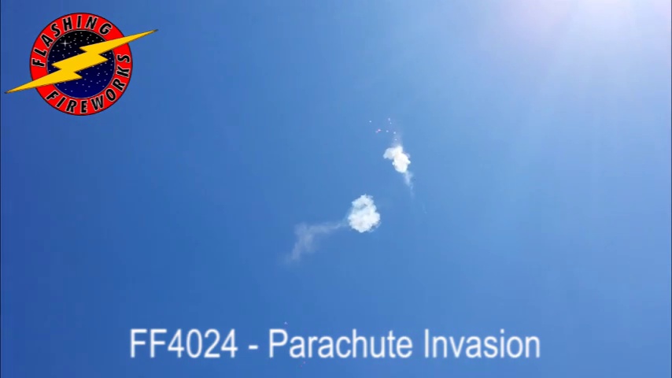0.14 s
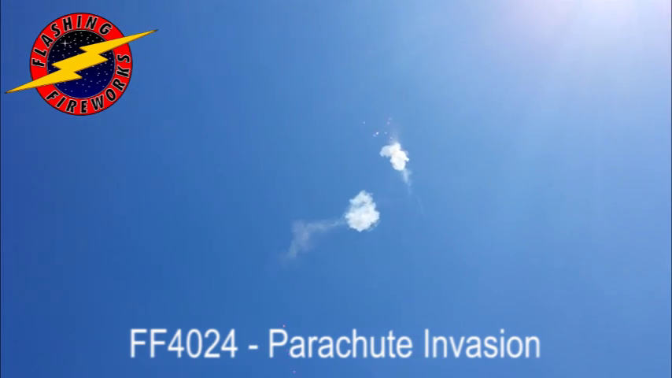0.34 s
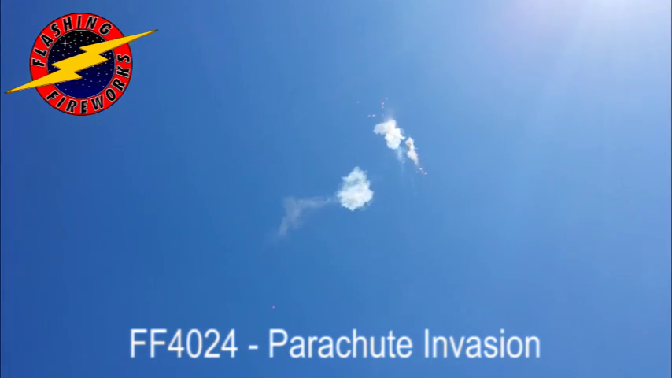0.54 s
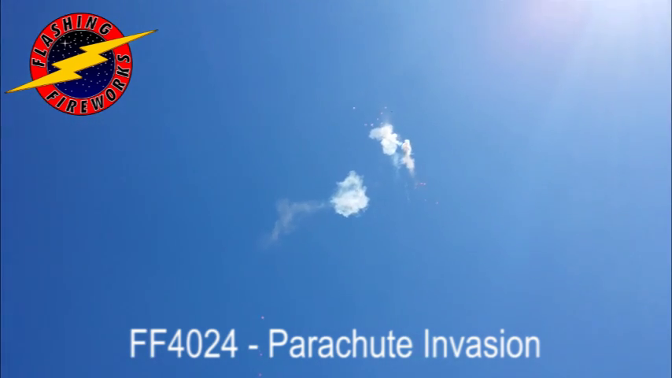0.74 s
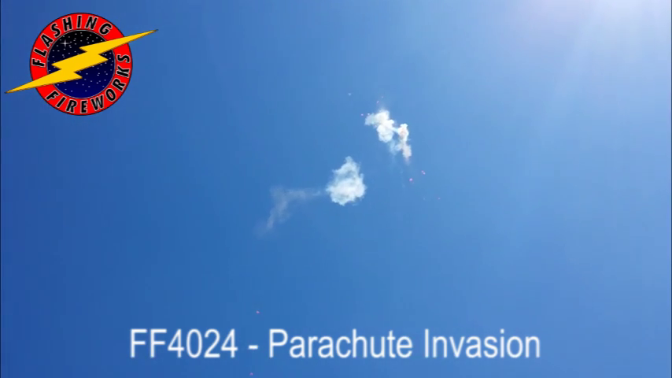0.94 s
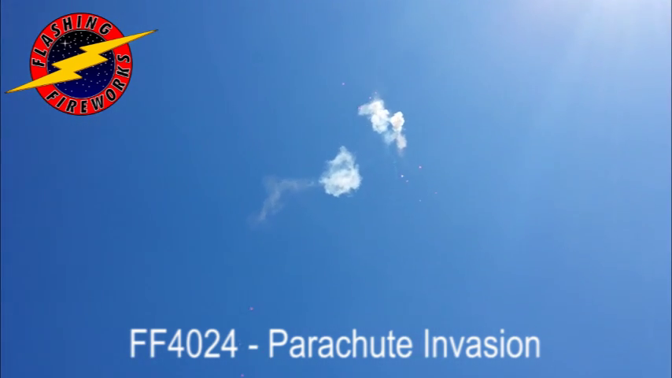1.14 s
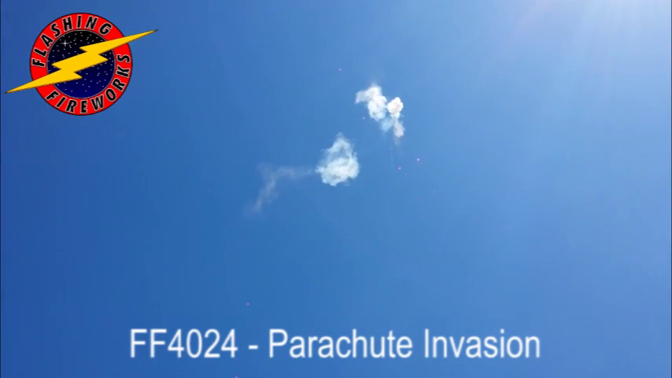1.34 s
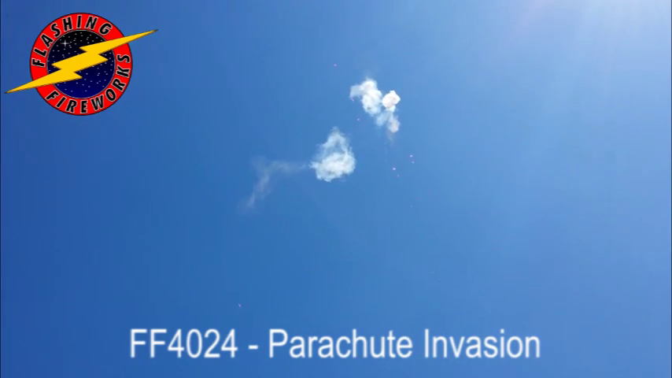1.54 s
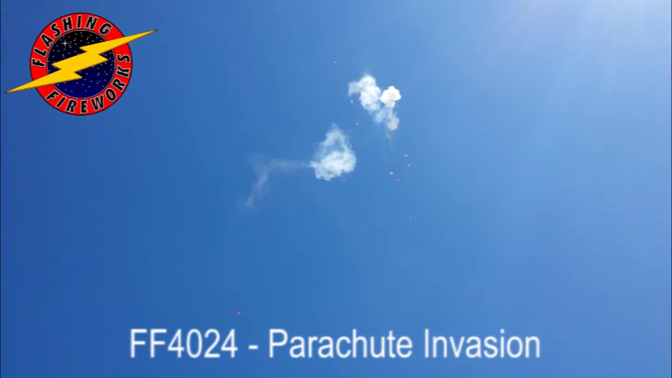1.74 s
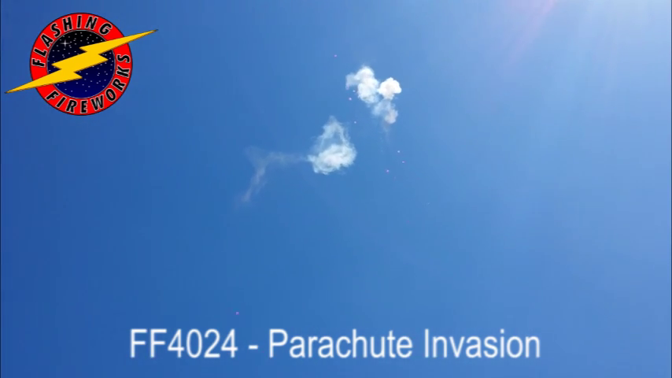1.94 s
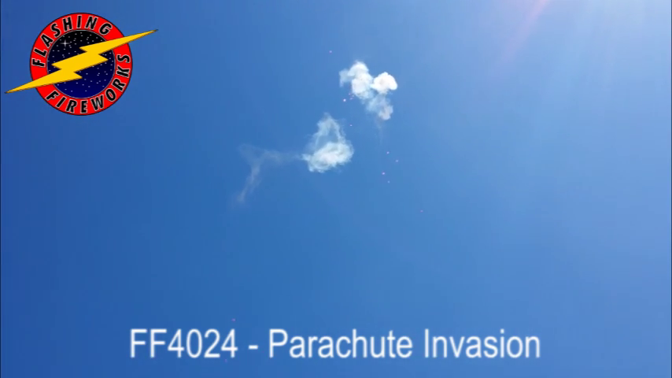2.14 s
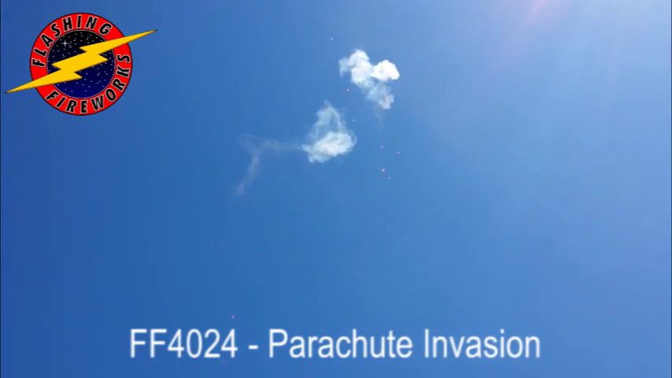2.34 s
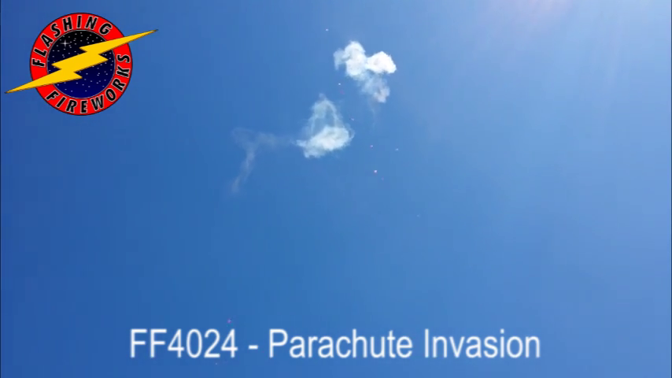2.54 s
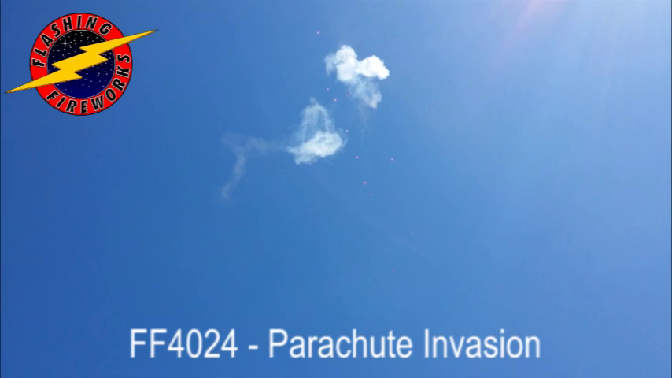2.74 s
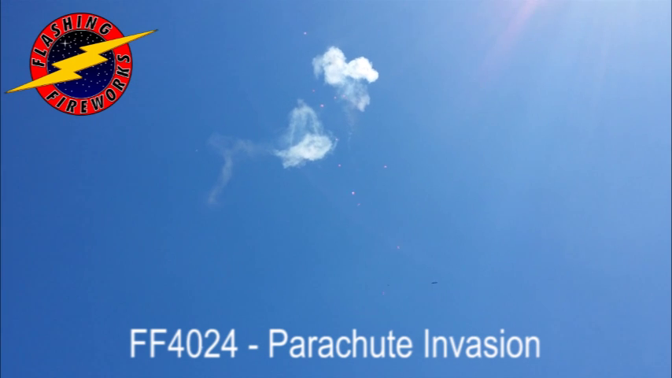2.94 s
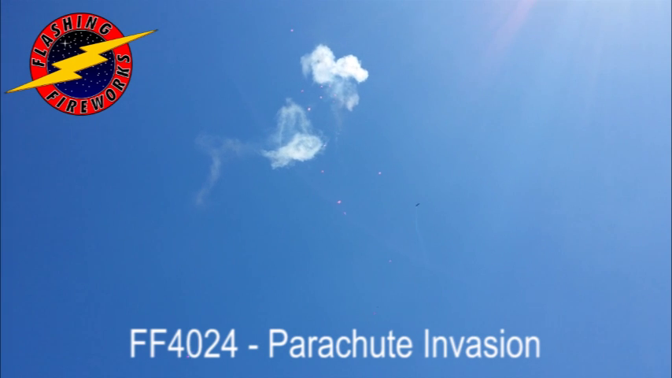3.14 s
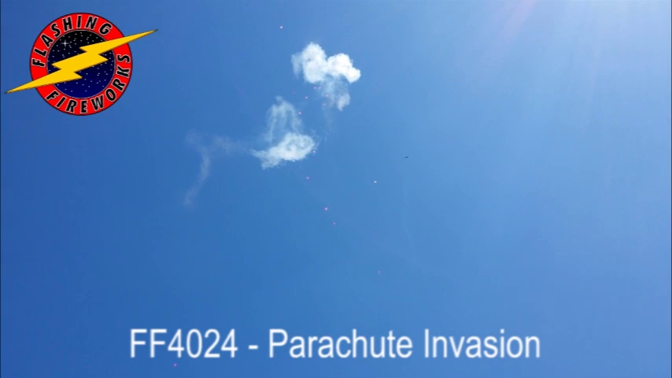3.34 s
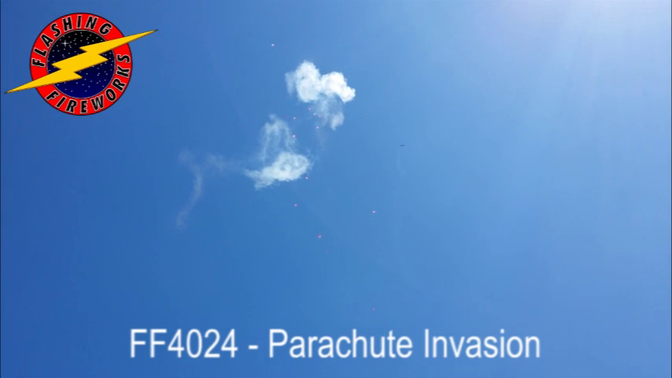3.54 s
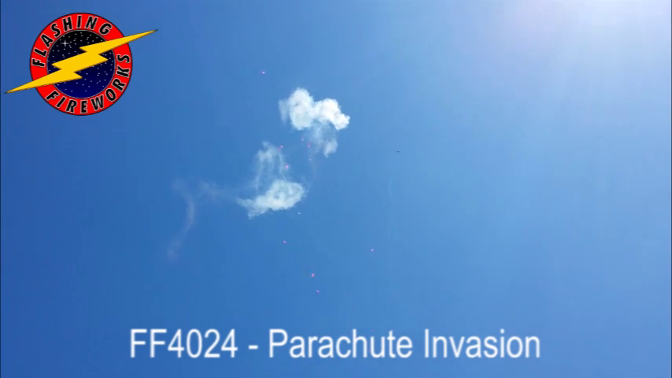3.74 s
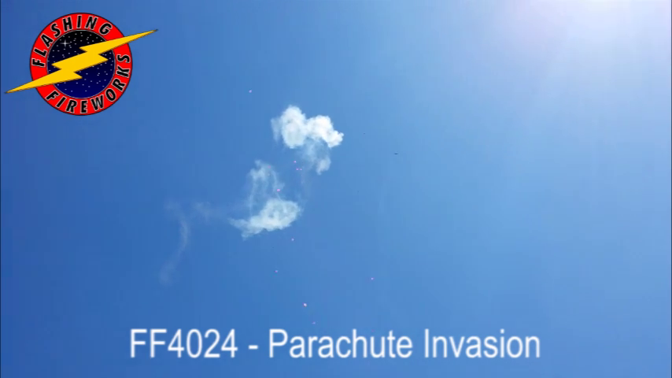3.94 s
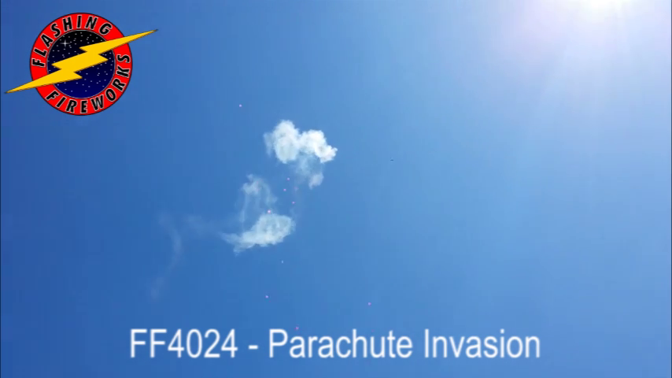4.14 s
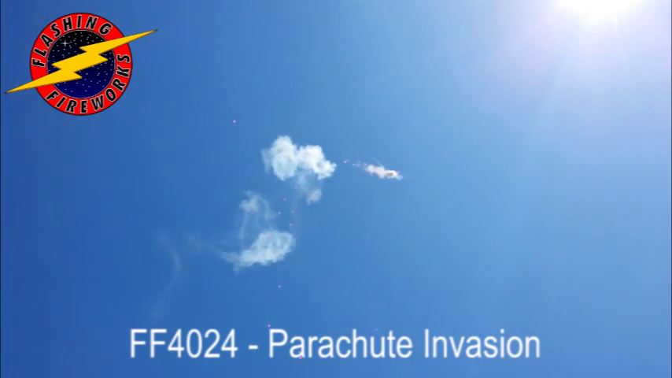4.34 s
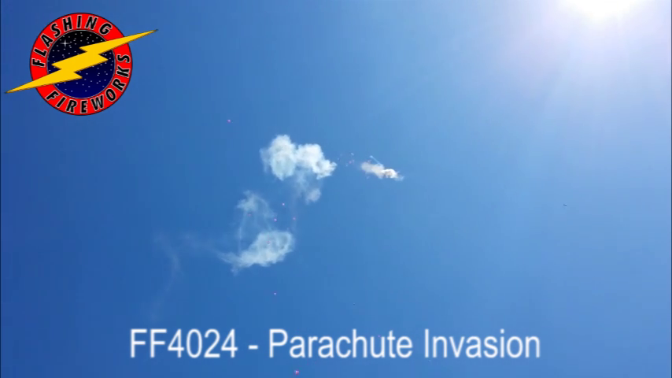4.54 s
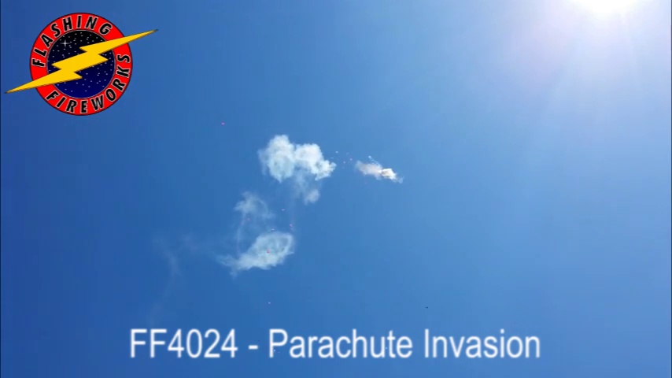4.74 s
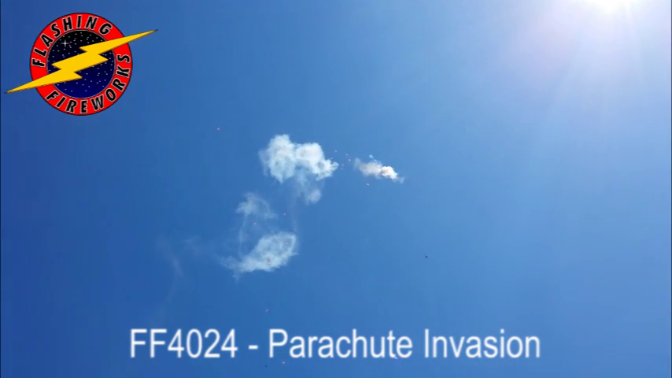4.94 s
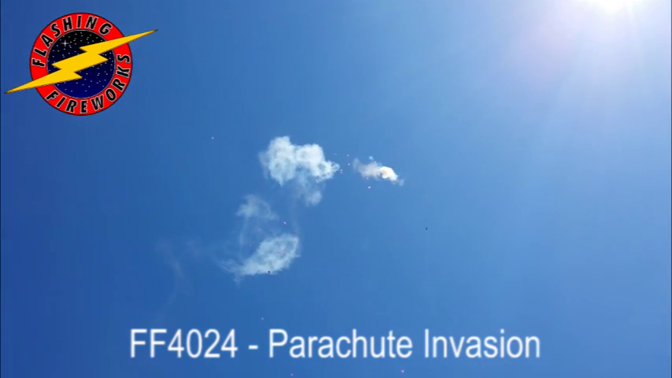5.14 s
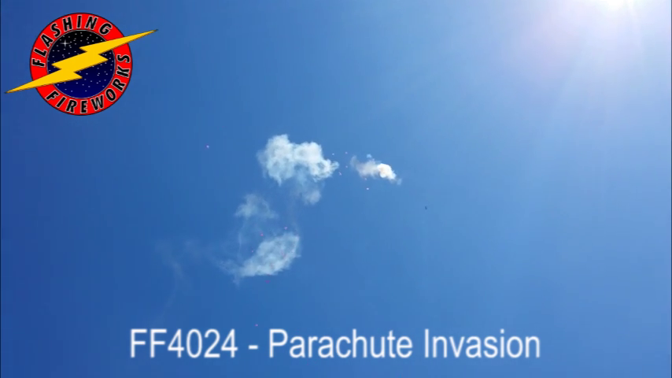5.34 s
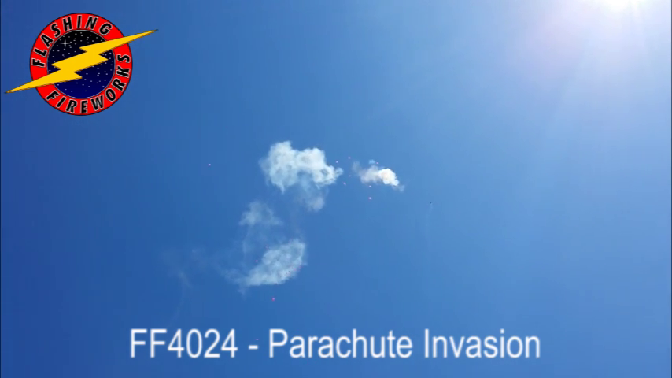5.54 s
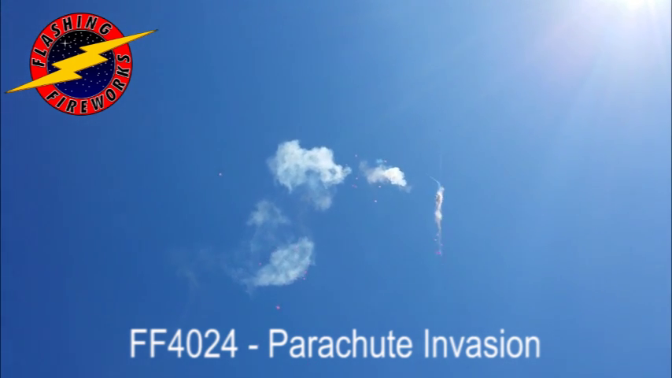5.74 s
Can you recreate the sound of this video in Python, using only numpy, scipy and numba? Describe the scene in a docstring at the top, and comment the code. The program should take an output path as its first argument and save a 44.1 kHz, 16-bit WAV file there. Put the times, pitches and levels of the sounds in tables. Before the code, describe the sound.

Five sharp firework cracks and booming launch shots echo across an open field, with faint birds and far traffic between them.

```python
"""Firework cake in an open field.

Lift charges boom from the tubes and shells crack high above, each crack arriving twice: direct
and off the ground. Grass and trees scatter every shot; hedges and far walls throw it back.
The shots overload a camera's two-port microphone: its gain ducks for about a second, then far
traffic, birds and faint hollow blips swell back."""
import sys
import numpy as np
from scipy import signal
from scipy.io import wavfile
from scipy.ndimage import uniform_filter1d
from numba import njit

SR = 44100
rng = np.random.default_rng(int(sys.argv[2]) if len(sys.argv) > 2 else 0)


def store_wav(level_fs):
    """Save 16-bit WAV to argv[1]."""
    pcm = np.round(np.clip(np.atleast_2d(level_fs), -1, 1) * 32767)
    wavfile.write(sys.argv[1], SR, pcm.T.astype(np.int16))


N = 254898


def undb(db):
    """Decibels to gain."""
    return 10 ** (np.asarray(db) / 20)


def panned(db, lean_db):
    """Stereo gains: the left raised by lean_db, the right lowered by as much."""
    return undb(db + lean_db * np.array([[1], [-1]]))


def add(out, x, s):
    """Mix x into out from s seconds on."""
    i = int(round(s * SR))
    n = max(min(x.shape[-1], N - i), 0)
    out[:, i:i + n] += x[..., :n]


def band(n, hz, octaves, alike_below_hz=550):
    """Diffuse noise band of rms near 1; both ports hear nearly the same bass."""
    edges = np.clip(hz * 2 ** (np.array([-octaves, octaves]) / 2), 20, SR / 2.1)
    bandpass = signal.butter(2, edges, "band", fs=SR, output="sos")
    x = signal.sosfilt(bandpass, rng.standard_normal((2, n + 2000)))[:, 2000:]
    x = x / x.std()
    alike = 1 / (1 + (hz / alike_below_hz) ** 2)
    mid, side = np.sqrt((1 + alike) / 2) * x[0], np.sqrt((1 - alike) / 2) * x[1]
    return np.array([mid + side, mid - side])


def wander(rate_hz, n=N):
    """Smooth random drift with a spread near 1."""
    hold = int(SR / rate_hz)
    steps = np.repeat(rng.standard_normal(n // hold + 1), hold)
    return 1.3 * uniform_filter1d(uniform_filter1d(steps, hold), hold)[:n]


def traffic_and_air():
    """The bed: rumble and roar of far traffic under a hiss of air, flickering in half-octave bands."""
    # Each row: frequency in Hz, relative noise density in dB.
    spectrum = [(24, -41), (40, -14), (108, -3.5), (427, -13), (621, -8), (1410, -20), (1730, -21),
                (3220, -24.5), (4460, -25), (5050, -26.5), (15500, -44.5)]
    # Each row: time in seconds, swell of the traffic in dB.
    traffic_swell = [(0, 1), (.4, 0.5), (.9, 1), (1.3, 1), (1.6, 4), (1.9, 0), (2.35, 0.5), (2.7, -0.5),
                     (3.0, 0), (3.3, 1), (3.6, 1.5), (4.0, -0.5), (4.6, 3), (5.2, 3), (5.65, 3.5)]
    t = np.arange(N) / SR
    rumble_db = -2 + .89 * t
    roar_db = np.interp(t, *np.transpose(traffic_swell))
    air_db = -3.5 + .4 * roar_db
    top_db = 10 * (t > 5.375) * np.exp(-np.abs(t - 5.375) / .11)  # the treble jumps once and sinks back
    roar_flicker_db = .7 * wander(16)
    layers_db = [rumble_db, roar_db + roar_flicker_db, air_db, top_db]
    spectrum_hz, density_db = np.transpose(spectrum)
    out = 0
    for hz in 45 * 2 ** np.arange(0, 8.6, .5):
        layer = np.searchsorted([300, 1700, 6500], hz)
        band_db = np.interp(np.log(hz), np.log(spectrum_hz), density_db) + 10 * np.log10(hz / 100)
        flicker_db = (2.5 if hz < 1500 else 1.2) * wander(20)
        out += panned(band_db + layers_db[layer] + flicker_db, 1.2 * (hz > 6500)) * band(N, hz, .5)
    return undb(-44.5 - 5.5) * np.array([np.roll(out[0], 10), out[1]])  # reaches the right port first


def frayed_notes(notes, rough, flutter_hz):
    """Short notes, steady or gliding, each from its own side and frayed by the air on the way."""
    out = np.zeros((2, N))
    for (s, length, start_hz, end_hz, db), lean_db in zip(notes, rng.uniform(-.5, 1.65, len(notes))):
        n = int(length * SR)
        flutter = uniform_filter1d(rng.standard_normal((2, 2, n)), int(SR / flutter_hz))
        fray = 1 + rough * (flutter[0] + 1j * flutter[1]) / flutter.std()
        glide = np.exp(2j * np.pi * np.cumsum(np.linspace(start_hz, end_hz, n)) / SR)
        envelope = signal.windows.tukey(n, .4) * np.exp(-.8 * np.arange(n) / n)
        add(out, panned(db, lean_db) * (fray * glide).imag * envelope, s)
    return out


def hollow_blips():
    """Faint 30 ms blips, often about an eighth of a second apart."""
    # Each row: start in seconds, pitch in Hz, level in dB.
    blips = [(.145, 643, -41), (.248, 696, -41), (1.435, 909, -37), (1.492, 625, -38.5), (1.64, 600, -41),
             (1.76, 536, -41), (1.88, 680, -41), (1.988, 723, -40.5), (2.038, 610, -44.5), (2.1, 647, -43),
             (2.295, 600, -38.5), (3.42, 697, -41), (3.538, 730, -42), (3.543, 1343, -45.5),
             (3.675, 860, -44), (5.433, 694, -42.5), (5.53, 701, -40)]
    return frayed_notes([(s, .03, hz, hz, db) for s, hz, db in blips], rough=1.1, flutter_hz=450)


def blast(swing_ms, stretch, decay_ms, top_hz, right_lead_ms=0):
    """A pressure jump whose swings grow ever longer: the lows arrive late."""
    delay_ms = np.array([[max(right_lead_ms, 0)], [max(-right_lead_ms, 0)]])
    ms = np.arange(int(.1 * SR)) * 1000 / SR - delay_ms
    age_ms = np.maximum(ms, 0)
    phase = np.pi * np.log1p(age_ms / swing_ms) / np.log(stretch)
    wave = (ms >= 0) * np.cos(phase) * np.exp(-age_ms / decay_ms)
    return signal.sosfilt(signal.butter(2, top_hz, fs=SR, output="sos"), wave)


def scatter(bands, rise_ms, treble_db=0, far_db=0):
    """A wash of noise: a quick decay from the near ground, a slow tail from far trees."""
    t = np.arange(SR) / SR
    bushes_db = 1.2 * wander(150, SR)  # single large bushes return all bands at once
    out = 0
    for hz, early_db, early_t60, late_db, late_t60 in bands:
        decay = undb(early_db - 60 * t / early_t60) + undb(late_db + far_db - 60 * t / late_t60)
        tail = band(SR, hz, 1.22) * decay
        patchy_db = 1.8 * wander(96, SR)
        out += tail * undb(bushes_db + patchy_db + treble_db * (hz > 1000))
    return out * (1 - np.exp(-1000 * t / rise_ms))


def add_echoes(out, s, db, walls, hedges):
    """Far walls slap a shot back whole; hedges smear it into a short rush."""
    for delay, echo_db, swing_ms, stretch, top_hz, right_lead_ms in walls:
        slap = blast(swing_ms, stretch, decay_ms=3.9, top_hz=top_hz, right_lead_ms=right_lead_ms)
        add(out, undb(db + echo_db) * slap, s + delay)
    for delay, length, hz, rush_db in hedges:
        n = int(length * SR)
        add(out, undb(db + rush_db) * band(n, hz, 1.6) * signal.windows.tukey(n, .5), s + delay)


def shell_bursts():
    """A shell cracks aloft, cracks again off the ground and leaves a bright wash."""
    # Each row: start in seconds, blast level in dB, bounce trim in dB, bounce delay in ms,
    # scatter and echo trim in dB, far-tree trim in dB, woods level in dB, left over right in dB.
    shells = [(0.4154, 16, -6.5, 10.55, 3, -2.5, -40, 1), (4.2197, 8, -6, 10.8, -6, -1.6, -39, 8),
              (5.6443, 15.5, -9, 10.8, -3.5, 6, -39, 3)]
    # Reflections off the camera and tripod. Each row: delay in ms, relative level in dB.
    near_repeats = [(1.2, -23.5), (2.5, -9.5), (3.4, -10.5), (6.8, -14.5)]
    # Each row: band in Hz, early gain in dB, early T60 in seconds, late gain in dB, late T60 in seconds.
    foliage = [(96.6, -25, 0.13, -48.5, 1.2), (250, -14.5, 0.086, -32.5, 1.2), (600, -21, .25, -28, 0.8),
               (1470, -9.5, 0.16, -30, 1.28), (3000, -14, 0.12, -26.5, 0.82), (6000, -10, 0.21, -30, 0.97),
               (11000, -13, 0.14, -39.5, 0.65)]
    # Each row: delay in seconds, gain in dB, swing in ms, stretch, top in Hz, right lead in ms.
    walls = [(.211, -15, 5.2, 1.31, 800, 0), (.225, -19, 4.6, 1.28, 700, 0.0085)]
    # Each row: delay in seconds, length in seconds, centre in Hz, gain in dB.
    hedges = [(0.195, 0.034, 3000, -38), (.211, .022, 535, -23.5), (.224, .014, 2190, -30.5),
              (0.33, .015, 2100, -42.5), (.363, 0.018, 3000, -39.5), (.47, 0.013, 1210, -41.5)]
    out = np.zeros((2, N))
    t, woods_t60_s = np.arange(2 * SR) / SR, 3.5
    for s, db, bounce_db, bounce_ms, scatter_db, far_db, woods_db, pan_db in shells:
        crack = panned(db, pan_db / 2) * blast(swing_ms=.25, stretch=3.3, decay_ms=3.6, top_hz=8000)
        add(out, crack, s)
        snap = signal.sosfilt(signal.butter(1, (800, 5000), "band", fs=SR, output="sos"), crack)
        for delay_ms, repeat_db in near_repeats:
            add(out, undb(repeat_db) * snap, s + delay_ms / 1000)
        # Rough ground returns the crack in two thinner pieces, the second with its sides swapped.
        bounce_s = s + bounce_ms / 1000
        bounce = blast(swing_ms=.3, stretch=3.6, decay_ms=1.5, top_hz=7500)
        add(out, undb(db + bounce_db + 2.5) * bounce, bounce_s)
        add(out, undb(bounce_db + 6.5) * snap[::-1], bounce_s + .6 / 1000)
        wash = undb(scatter_db + 3) * scatter(foliage, rise_ms=3.5, far_db=far_db)
        add(out, undb(-9) * wash[:, :int(bounce_ms * SR / 1000)], s)  # softer until the bounce lands
        add(out, wash, bounce_s)
        farthest_woods = undb(woods_db - 60 * t / woods_t60_s) * band(2 * SR, 2600, 1.9)
        add(out, farthest_woods, s)
        add_echoes(out, s, scatter_db, walls, hedges)
    return out


def birds():
    """Short chirps and one slow, falling whistle."""
    # Each row: start in seconds, length in seconds, first pitch in Hz, last pitch in Hz, level in dB.
    chirps = [(1.436, .021, 2320, 2420, -43.5), (1.456, 0.017, 2330, 2190, -39),
              (1.452, .02, 6950, 7000, -55), (1.705, .025, 4220, 4330, -60),
              (1.785, 0.033, 4880, 4470, -64), (2.02, .03, 6150, 5840, -62), (2.094, .031, 4300, 4400, -53),
              (2.115, 0.024, 2640, 2780, -53), (2.185, 0.034, 4440, 4700, -56),
              (2.29, 0.045, 4310, 4680, -53.5), (2.655, 0.023, 3000, 2600, -39.5),
              (2.655, .022, 6030, 5400, -48), (2.683, .045, 2590, 2500, -53),
              (2.925, 0.022, 3240, 3080, -48.5), (3.01, .026, 4250, 4300, -53.5),
              (5.591, 0.022, 4300, 4300, -52)]
    whistle_hz, length_s, fall_hz_per_s = 6130, .34, 2650
    whistle = (1.7, length_s, whistle_hz, whistle_hz - fall_hz_per_s * length_s, -61.5)
    chirping = frayed_notes(chirps, rough=1.1, flutter_hz=380)
    return chirping + frayed_notes([whistle], rough=1.2, flutter_hz=250)


def capsule_squeal(n, hz, rough):
    """A shock overloads the microphone capsules into a squeal, part tone and part noise."""
    tone = np.sin(2 * np.pi * hz * np.arange(n) / SR + np.array([[0], [2.]]))
    return (1 - rough) * tone + rough * band(n, hz / 2, 4.1)


def lift_charges():
    """A small pop, a shock that makes the capsules squeal, then the boom and ring of the tube."""
    # Each row: blast level in dB, scatter and echo trim in dB, treble trim in dB, squeal pitch in Hz,
    # squeal level in dB, squeal roughness from 0 to 1, hold-off of the left wash in ms.
    charges = [(18, 0.5, 3, 6400, 18.5, 0.5, 30), (19, -1.5, -2.5, 9700, 9.5, 0.37, 1.8)]
    # When each charge fires, in seconds.
    starts = (2.3764, 4.0244)
    # Each row: band in Hz, early gain in dB, early T60 in seconds, late gain in dB, late T60 in seconds.
    foliage = [(103, -13.5, 0.21, -38, 1.4), (243, -7, 0.18, -26.5, 1.3), (600, -2, 0.21, -31.5, 1),
               (1330, -5.5, 0.13, -44.5, .8), (3000, -10.5, 0.17, -43, 0.7), (6000, -8, 0.18, -39.5, .8),
               (10960, -23.5, 0.21, -55.5, 0.57)]
    # Each row: delay in seconds, gain in dB, swing in ms, stretch, top in Hz, right lead in ms.
    walls = [(.063, -4.5, 5.7, 1.22, 700, 0), (0.25, -2.5, 3.04, 1.475, 835, -.05),
             (.296, -24, 2.3, 1.37, 600, 0), (0.478, -26, 4.7, 1.8, 500, 0), (.80, -25.5, 5, 1.5, 400, 0),
             (0.916, -23.5, 1.95, 1.42, 900, 0.49), (0.986, -16, 0.83, 1.57, 1090, 0.4)]
    # Each row: delay in seconds, length in seconds, centre in Hz, gain in dB.
    hedges = [(.03, .04, 700, -23.5), (0.09, 0.029, 6000, -28.5), (.41, 0.041, 4870, -48)]
    out = np.zeros((2, N))
    n = int(.0022 * SR)  # length of the squeal
    ms = np.arange(int(.06 * SR)) * 1000 / SR
    tube_overtone = np.sin(2 * np.pi * 344 * ms / 1000) * np.exp(-ms / 7.2)
    boom = blast(swing_ms=24, stretch=1.16, decay_ms=5.4, top_hz=1500, right_lead_ms=-.55)
    ground_heave = blast(swing_ms=14, stretch=2.6, decay_ms=17, top_hz=600)
    for s, (db, scatter_db, treble_db, squeal_hz, squeal_db, rough, hold_ms) in zip(starts, charges):
        add(out, undb(squeal_db) * capsule_squeal(n, squeal_hz, rough), s)
        add(out, -undb(db - 5.5) * np.hanning(n), s + .00018)  # the capsules are pushed in
        gas_jet = band(3 * n, 1700, 1.6) * np.exp(-np.arange(3 * n) / n)
        add(out, undb(db - 11.5) * gas_jet, s)
        pop = blast(swing_ms=.6, stretch=2.2, decay_ms=2.5, top_hz=3500)
        pop[:, :2 * n] += undb(-7.5) * band(2 * n, 2500, 2.5)
        add(out, undb(-17) * pop, s - 4.9 / 1000)
        add(out, panned(db, -1.5) * boom, s + .002)
        add(out, panned(db - 7, -4) * tube_overtone, s + .0025)
        add(out, panned(db - 10, 1.5) * ground_heave, s + .0067)
        ground_bounce = band(n // 2, 5600, 2.2)
        add(out, undb(db - 18 + treble_db) * ground_bounce, s + .0063)
        wash = undb(scatter_db + .5) * scatter(foliage, rise_ms=.8, treble_db=treble_db)
        wash[0] *= np.clip((np.arange(SR) * 1000 / SR - hold_ms) / 8, .03, 1)  # the left opens late
        add(out, wash, s + .002)
        add_echoes(out, s, scatter_db, walls, hedges)
    return out


def scene():
    """Three shell bursts and two lift charges over the quiet field."""
    return shell_bursts() + lift_charges() + birds() + hollow_blips() + traffic_and_air()


@njit
def duck(peak, threshold, depth_db, start_db, attack, hold_s, release_db_per_s):
    """Camera gain in dB: dives while the input is over the threshold, holds, then climbs back evenly."""
    out, db, wait = np.empty(len(peak)), start_db, 0.
    for i in range(len(peak)):
        if peak[i] > threshold:
            db += (depth_db - db) * attack
            wait = hold_s * SR
        elif wait > 0:
            wait -= 1
        else:
            db = min(db + release_db_per_s / SR, 0.)
        out[i] = db
    return out


def record(dry):
    """The camera: port resonances, bass cut, ducking, preamp hiss, soft clipping and a steep top cut."""
    # Microphone port resonances. Each row: centre in Hz, width in Hz, level in dB.
    ports = [(2380, 490, -3), (4300, 1500, -8), (6800, 1300, -8)]
    ring = sum(undb(db) * signal.lfilter(*signal.iirpeak(hz, hz / width, SR), dry)
               for hz, width, db in ports)
    x = signal.sosfilt(signal.butter(4, 58, "high", fs=SR, output="sos"), dry + ring)
    gain_db = duck(np.abs(x).max(axis=0), threshold=.7, depth_db=-13.5, start_db=-6.5,
                   attack=.1, hold_s=.81, release_db_per_s=20)
    hiss = undb(-71) * band(N, 3000, 1.8)
    x = x * undb(gain_db) + hiss
    clipped = x / (1 + (np.abs(x) / .94) ** 4) ** .25
    return signal.sosfilt(signal.ellip(8, .2, 80, 16000, fs=SR, output="sos"), clipped)


dry = scene()
out = record(dry)
store_wav(out)
```